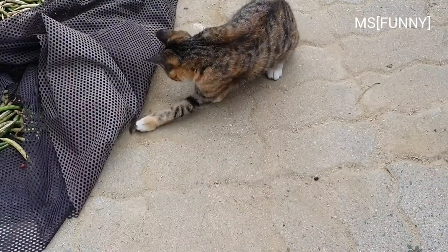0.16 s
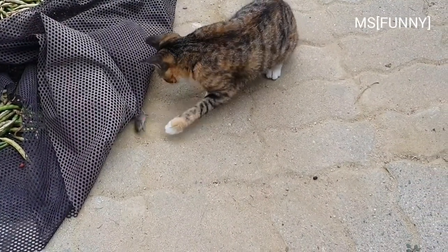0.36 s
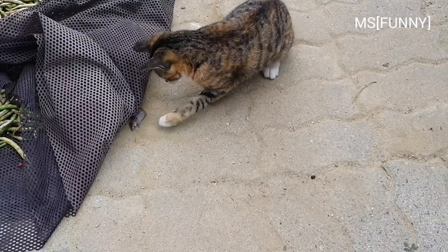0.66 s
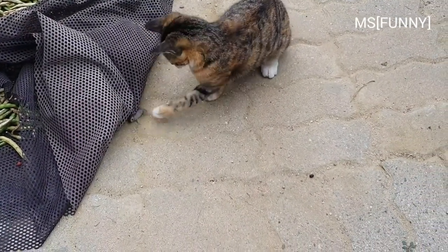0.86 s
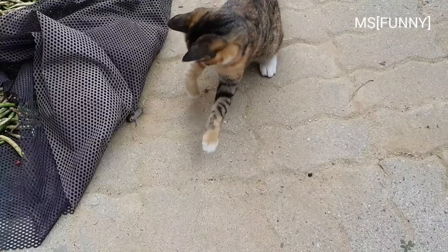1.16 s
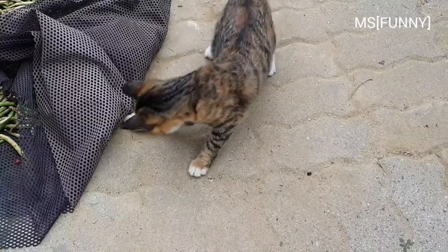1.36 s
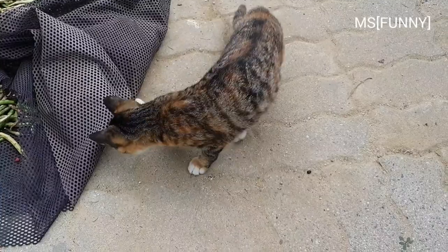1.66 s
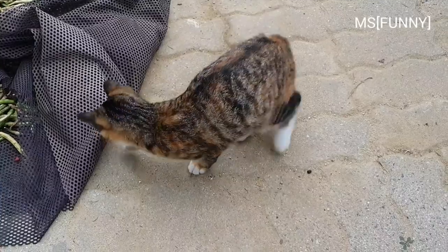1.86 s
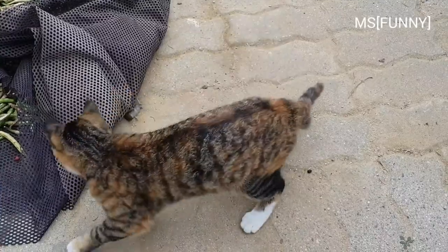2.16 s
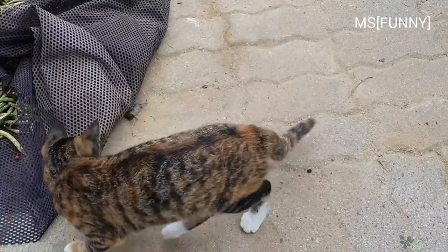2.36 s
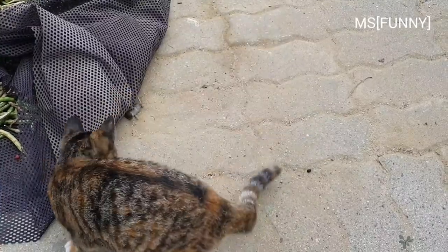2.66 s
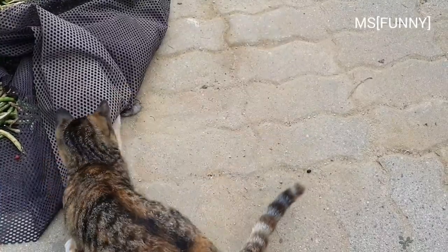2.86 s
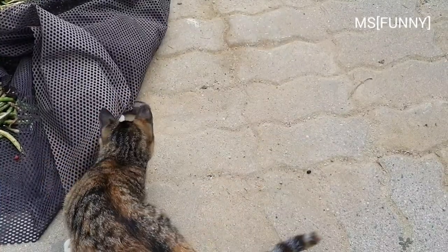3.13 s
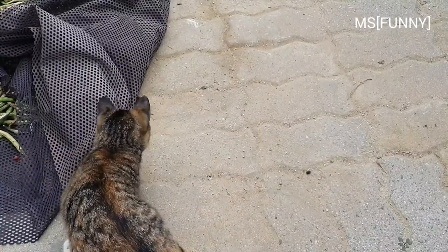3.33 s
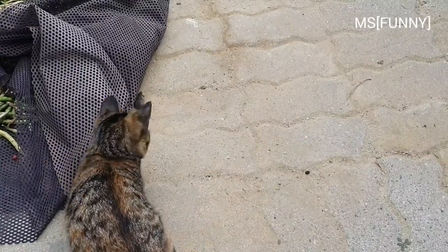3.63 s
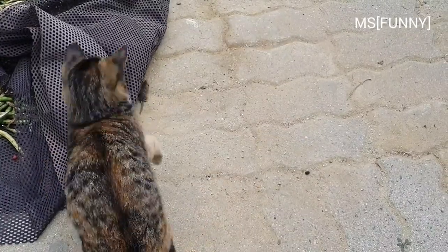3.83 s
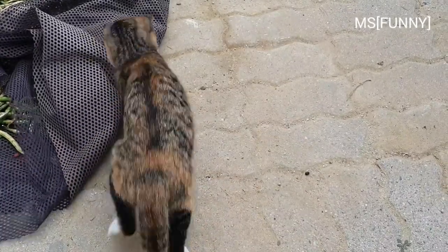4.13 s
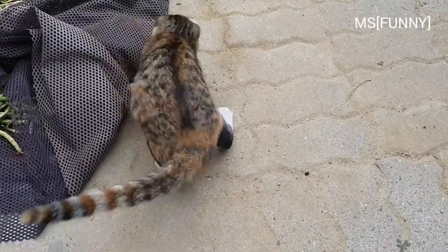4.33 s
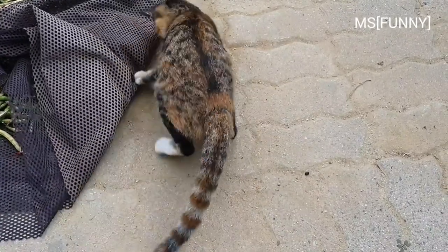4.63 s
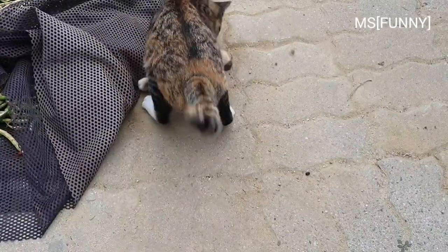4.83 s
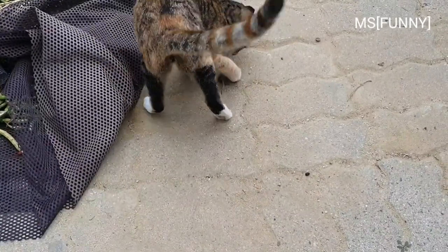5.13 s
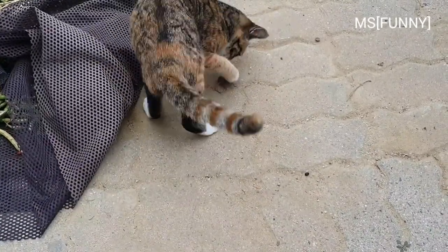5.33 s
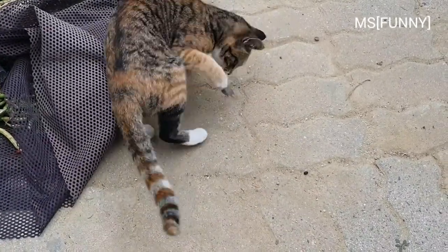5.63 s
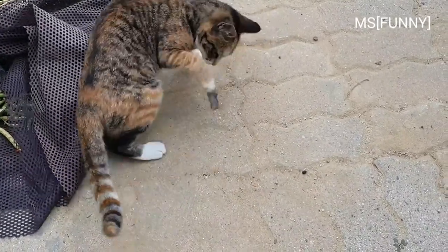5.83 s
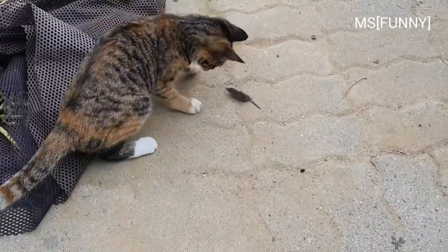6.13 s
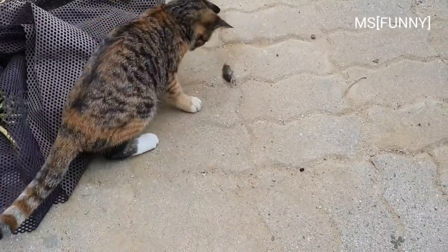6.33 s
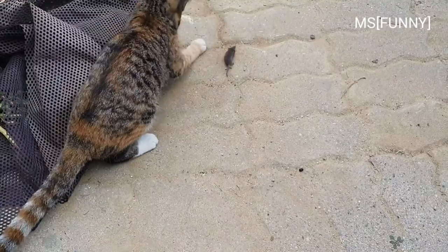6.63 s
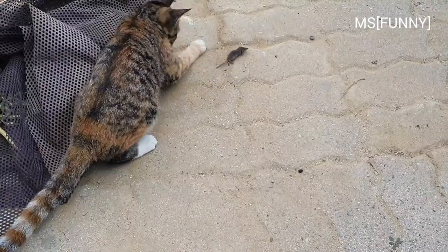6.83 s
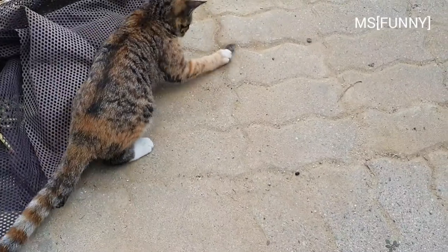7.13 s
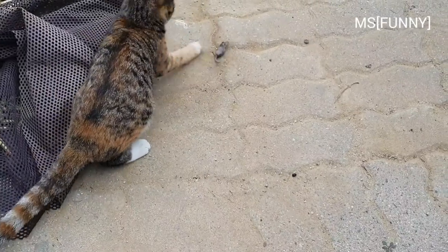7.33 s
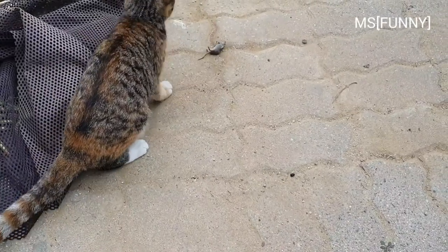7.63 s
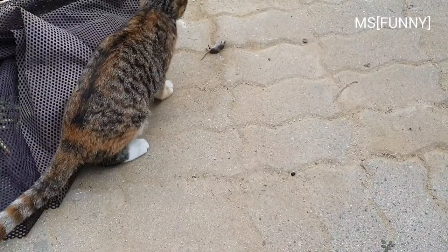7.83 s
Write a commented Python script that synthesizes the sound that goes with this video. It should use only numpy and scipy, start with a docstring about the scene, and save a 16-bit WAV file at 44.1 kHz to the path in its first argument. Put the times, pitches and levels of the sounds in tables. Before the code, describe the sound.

A mouse gives brief, extremely high fluttering squeaks and breathy rasps as a cat paws at it, amid echoing birdsong, faint hoarse calls and hiss.

```python
"""A mouse whistles fluttering squeaks on paving, close by, while a cat paws at it beside a heap of netting.
The squeaks are gliding tones with a trembling beat; rasps, brushing paws and thuds are shaped noise or rough tones.
Birds call in echoing surroundings and a hoarse low call comes from afar, over traffic rumble and microphone hiss.
The loudest squeaks overload the converter."""
import sys
import numpy as np
from scipy import signal
from scipy.fft import rfft, irfft, next_fast_len
from scipy.io import wavfile
from scipy.ndimage import uniform_filter1d, map_coordinates

SR = 44100
rng = np.random.default_rng(int(sys.argv[2]) if len(sys.argv) > 2 else 0)


def generate_wav(signal):
    """Clip the signal to [-1, 1] and save it as 16-bit WAV at the path in sys.argv[1]."""
    frames = np.transpose(np.atleast_2d(signal))
    scaled = np.clip(frames, -1, 1) * 32767
    pcm = np.round(scaled).astype(np.int16)
    wavfile.write(sys.argv[1], SR, pcm)


N = 351918
TIME = np.arange(N) / SR
EDGE_DB = 20  # how far a swell lies under its peak one rise before it and one fall after it

# colour of the mouse's breath noise: f/Hz, level per Hz/dB
BREATH_COLOUR = [(3240, -69), (5500, -42), (6910, -15.5), (7950, -20), (8540, -16.5), (13300, -1),
                 (14900, -14), (15100, -11.5)]
# colour of the traffic drone, also used for the puff in the thuds: f/Hz, level per Hz/dB
DRONE_COLOUR = [(70, -66), (105, -11), (140, -10), (210, -5.5), (260, -11), (330, -21), (500, -24),
                (800, -27.5), (1200, -39.5), (2500, -76)]


def amp(db):
    """Turn decibels into a factor for the wave."""
    return 10 ** (np.asarray(db) / 20)


def unit(x):
    """Scale x to an rms (average strength) of 1."""
    return x / np.sqrt(np.mean(np.abs(x) ** 2) + 1e-20)


def along(points, hz):
    """Read a curve of (Hz, value) points on a log frequency axis."""
    f, value = np.transpose(points)
    return np.interp(np.log(hz + 1), np.log(f + 1), value)


def curves(tables, fade=0.001):
    """A gate that is open inside the tables, then one smooth curve for each column; fade in s."""
    s, *columns = np.vstack(tables).T
    is_open = np.any([(TIME >= rows[0][0]) & (TIME <= rows[-1][0]) for rows in tables], axis=0)
    drawn = [is_open * 1.] + [np.interp(TIME, s, column) for column in columns]
    return [uniform_filter1d(curve, int(fade * SR) + 1) for curve in drawn]


def swells(rows, flat):
    """For rows (peak s, rise s, fall s, Hz, peak dB, ..): level dB, dB under the peak, Hz and further columns.
    The loudest row wins at each sample. The larger flat, the broader the top."""
    rows = np.array(rows)
    level_db, which = np.full(N, -150.), np.zeros(N, int)
    for k, (s, rise, fall, _, db) in enumerate(rows[:, :5]):
        near = slice(max(0, int((s - .5) * SR)), int((s + .5) * SR))
        distance = np.maximum((s - TIME[near]) / abs(rise), (TIME[near] - s) / abs(fall))
        own_db = db - EDGE_DB * distance ** flat
        which[near] = np.where(own_db > level_db[near], k, which[near])
        level_db[near] = np.maximum(own_db, level_db[near])
    _, _, _, hz, db, *more = rows[which].T
    return [level_db, np.clip(db - level_db, 0, 2 * EDGE_DB), hz] + more


def wobble(rate, channels=1):
    """Smooth random curves of rms 1, with rate knots a second."""
    knots = rng.standard_normal((channels, int(N * rate / SR) + 4))
    return unit(np.array([map_coordinates(k, [TIME * rate]) for k in knots]))


def filtered(x, response):
    """Weigh the frequencies of x by a response."""
    m = next_fast_len(N + 8192)
    return irfft(rfft(x, m) * response(np.fft.rfftfreq(m, 1 / SR)), m)[..., :N]


def rush(spectrum):
    """Stereo noise of rms 1 whose sides are alike in the bass and unrelated in the treble."""
    # likeness of left and right: f/Hz, likeness/0-1
    likeness = [(60, 0.95), (150, 0.91), (380, 0.41), (940, 0.028), (2340, 0.02), (5860, 0.017),
                (14700, 0.0285)]

    def mid_and_side(hz):
        turn = np.arccos(np.clip(along(likeness, hz), -1, 1)) / 2
        return amp(along(spectrum, hz)) * [np.cos(turn), np.sin(turn)]

    mid, side = filtered(rng.standard_normal((2, N)), mid_and_side)
    return unit(np.array([mid + side, mid - side]))


def echoes(x, t60, gap):
    """A diffuse tail, different in each channel: it starts after gap s and falls 60 dB in t60 s."""
    t = np.arange(int(SR * t60)) / SR
    tail = rng.standard_normal((2, len(t))) * amp(-60 * t / t60) * (t > gap)
    return signal.fftconvolve(np.atleast_2d(x), tail / np.linalg.norm(tail[0]), axes=1)[:, :N]


def sides(pan_db):
    """Left and right factors; a positive pan_db makes the left louder."""
    return amp(np.array([pan_db / 2, -pan_db / 2]))


def whistle(hz, rough, flicker, lag=0):
    """A stereo tone whose strength and phase flicker by the share rough; the left lags by lag s."""
    side_delay = np.array([lag / 2, -lag / 2]).reshape(2, -1)
    phase = 2 * np.pi * (np.cumsum(hz) / SR - hz * side_delay)
    a, b = flicker
    rough = np.clip(rough, 0, 1)
    steady = np.sqrt(1 - rough ** 2)
    return np.sqrt(2) * ((steady + rough * a * 1.1) * np.sin(phase) + rough * b * 1.1 * np.cos(phase))


def squeaks():
    """A whistle in the larynx; the trembling breath moves pitch and level on every beat.
    The balance between left and right shifts along each squeak."""
    # one curve for each squeak: t/s, f/Hz, level/dB
    notes = [
        [(.451, 12170, -24), (.457, 12200, -16.5), (.461, 13290, -18), (.470, 13420, -15), (.480, 13090, -11),
         (.486, 12920, -9.5), (.493, 12930, -5), (.508, 12670, -3.5), (.514, 12670, -4.5), (.521, 12600, -9.5),
         (.526, 12800, -9.5), (.534, 13700, -12), (.540, 13050, -17.5), (.544, 13450, -28), (.550, 12240, -27),
         (.556, 12820, -41)],
        [(.799, 12400, -27), (.807, 12790, -32), (.815, 12500, -26), (.8165, 14400, -18), (.835, 13940, -23),
         (.855, 14060, -19), (.866, 13300, -18.5), (.884, 13100, -23), (.888, 13200, -33), (.902, 13180, -39)],
        [(1.622, 11750, -33), (1.634, 12000, -34.5), (1.640, 11600, -26), (1.648, 12200, -34)],
        [(1.654, 12100, -20), (1.662, 12360, -22.5), (1.668, 12190, -27), (1.673, 11370, -33),
         (1.678, 11410, -44)],
        [(1.681, 11340, -39), (1.693, 11570, -33), (1.7145, 11860, -28.5), (1.7165, 12900, -29),
         (1.724, 12700, -23), (1.734, 12600, -37.5)],
        [(4.648, 12200, -18), (4.651, 12360, -11), (4.659, 12330, -9), (4.666, 12660, -5.5),
         (4.671, 12610, -6.5), (4.685, 12510, -12.5), (4.697, 12370, -16.5), (4.709, 11350, -23),
         (4.714, 11070, -26), (4.724, 11600, -36), (4.730, 10970, -33)],
        [(4.733, 10100, -56), (4.757, 10550, -33.5), (4.779, 11300, -28), (4.792, 11400, -37.5),
         (4.800, 11940, -34), (4.819, 11770, -39.5)],
        [(4.995, 10050, -47), (5.003, 10300, -43), (5.009, 10600, -44), (5.012, 10700, -35),
         (5.017, 10900, -32), (5.027, 11300, -35), (5.042, 11000, -33), (5.056, 11650, -31),
         (5.066, 11130, -31), (5.081, 11400, -37), (5.09, 10860, -49), (5.13, 11200, -58)],
        [(5.225, 9750, -44), (5.239, 10950, -34), (5.277, 10760, -32.5), (5.281, 11000, -27),
         (5.296, 11540, -22.5), (5.318, 11220, -25), (5.34, 11460, -24.5), (5.352, 11500, -38),
         (5.37, 11400, -46)],
        [(5.671, 9560, -30), (5.678, 10060, -33), (5.689, 10570, -19.5), (5.703, 10870, -20.5),
         (5.710, 11500, -27), (5.717, 11900, -14), (5.722, 12260, -7.5), (5.734, 12270, -5.5),
         (5.739, 11200, -20), (5.746, 11900, -14.5), (5.750, 10950, -24.5), (5.763, 10490, -35)],
    ]
    # one row for each squeak: first crest t/s, beat rate/Hz, pitch swing/Hz, level swing/dB, roughness/0-1,
    # left lag/s, left-right level at the start/dB, left-right level at the end/dB
    flutter = np.array([(0.4532, 115, 30, 0.2, 0, -5e-6, 6, 0.5),
                        (0.8028, 130, 335.6, 1, 0.18, -16e-6, 4, 7),
                        (1.627, 170, 200.3, 2, 0.2, 4e-6, 16, 9), (1.672, 140, 40.1, 0.5, .1, 4e-6, 8, 0),
                        (1.7007, 120, 220, 1, 0.2, -12e-6, 19, 2),
                        (4.6505, 130, 170.6, 0.5, 0.14, 7e-6, 6, 12.5),
                        (4.76, 100, 142, 2.5, 0.23, 18e-6, 11, 2), (5.01, 130, 200, 1, 0.08, 6e-6, 5, 2),
                        (5.236, 89, 187.2, 0.5, 0.22, 20e-6, 4, -2.5),
                        (5.679, 110, 150, 1, 0.06, 12e-6, 13, -4.5)])
    # where the voice catches: t/s, half width/s
    breaks = np.array(sorted([(.5445, 0.0017), (.8065, .0015), (.8157, 0.00087), (1.63, 0.00093),
                              (1.639, 0.001), (1.648, 0.001), (1.7155, 0.0009), (4.6553, 0.0025),
                              (4.6635, 0.0016), (4.793, 0.0014), (4.807, .0011), (5.020, 0.0019),
                              (5.044, 0.00099), (5.065, 0.001), (5.076, .003), (5.232, 0.00304),
                              (5.242, .002), (5.252, 0.0012), (5.268, .0015), (5.279, 0.001),
                              (5.678, 0.0014), (5.708, 0.00088), (5.714, 0.0014)]))
    break_depth = 0.9  # share of the sound lost in the middle of a catch
    wander_db = 1.2  # random wander between the sides, rms

    gate, hz, db = curves(notes)
    # each squeak's settings begin 20 ms before its first crest
    row = np.clip(np.searchsorted(flutter[:, 0], TIME + .02) - 1, 0, None)
    crest, rate, swing, swing_db, rough, lag = flutter[row, :6].T
    note_ends = [s for note in notes for s in (note[0][0], note[-1][0])]
    pan_db = np.interp(TIME, note_ends, flutter[:, -2:].ravel()) + wander_db * wobble(70)[0]

    beat = np.cos(2 * np.pi * rate * (TIME - crest) + 0.28 * wobble(50)[0])
    pitch = hz + swing * beat + 40 * wobble(300)[0]
    tone = whistle(pitch, rough, wobble(700, channels=2), lag + 3e-6 * wobble(40)[0])
    # air past the whistle
    breath = unit(filtered(rng.standard_normal((2, N)), lambda f: amp(along(BREATH_COLOUR, f))))

    midpoints = (breaks[1:, 0] + breaks[:-1, 0]) / 2
    nearest, width = breaks[np.searchsorted(midpoints, TIME)].T
    gate = gate * (1 - break_depth * np.exp(-((TIME - nearest) / width) ** 4))
    return gate * amp(db + swing_db * beat) * sides(pan_db) * (tone + (amp(-35.5) + 0.25 * rough) * breath)


def rasps():
    """Air bursts unevenly through the open larynx: treble noise, strongest at the mouth's resonance."""
    # voiceless rasps: peak t/s, rise/s, fall/s, mouth resonance f/Hz, peak level before mixing/dB,
    # left-right level/dB
    bursts = [(.440, 0.016, 0.0051, 12730, -32.5, 4), (.4455, .005, .002, 11240, -26, 3),
              (.792, 0.002, .012, 12240, -33, 5.5), (.812, 0.018, .02, 13080, -37.5, 4),
              (1.634, 0.014, .03, 11560, -33.5, 4), (1.652, .005, .012, 13200, -26, -12),
              (1.674, .006, 0.022, 11850, -34, 7), (4.436, 0.02, 0.0201, 13130, -28, 3),
              (4.444, 0.0039, 0.005, 13000, -14, 6), (4.453, 0.0096, 0.0096, 13300, -15.5, 6),
              (4.462, 0.0048, .03, 13000, -17.5, 2), (4.483, .02, .05, 14000, -21, 2),
              (4.645, 0.0115, 0.0032, 11800, -26, 10), (4.961, 0.0012, 0.0046, 11740, -39, 17),
              (4.985, .04, .04, 12000, -42, 7), (5.235, 0.032, .06, 11270, -39, 3.5),
              (5.66, 0.024, .006, 11800, -47, 8), (5.668, 0.0048, 0.0084, 11870, -25.5, 12.5)]
    db, _, hz, pan_db = swells(bursts, flat=1.5)
    # a little noise shared by both sides, much more of their own
    air = 0.17 * rng.standard_normal(N) + 2.1 * rng.standard_normal((2, N))
    wide = unit(filtered(air, lambda f: amp(along(BREATH_COLOUR, f))))
    # each side has its own flicker, which blurs the tone into a noise band
    mouth = np.array([whistle(hz, 0.99, wobble(1800, channels=2))[side] for side in range(2)])
    uneven = unit(amp(1.8 * wobble(450)))
    return amp(db) * sides(pan_db) * uneven * (0.5 * wide + 0.51 * mouth)


def nearby(x):
    """Sound bounces off paving, net and cat: a few early reflections, then a faint short tail."""
    # reflections: delay/s, left level/dB, right level/dB
    bounces = [(.0006, -22, -18), (.0017, -29, -24), (.0041, -30, -27), (.0083, -33, -31)]
    early = 0
    for s, left_db, right_db in bounces:
        early = early + amp([[left_db], [right_db]]) * np.roll(x, round(s * SR), axis=1)
    return x + early + amp(-27) * echoes(x, t60=.15, gap=.003)


def mesh(hz):
    """The sound of the net by frequency: thin in the bass, with a hollow hump near 1900 Hz."""
    thin = hz ** 2 / (hz ** 2 + 500 ** 2)
    return thin * amp(3 / (1 + ((hz - 1900) / 500) ** 2))


def paws():
    """Fur and claws drag over mesh and paving: short swells of grainy noise."""
    # strokes: middle t/s, bell width (one standard deviation)/s, level/dB, brightness/dB per octave,
    # left-right level/dB
    strokes = [(0.499, 0.042, -40, 0, 3.5), (0.853, 0.035, -44, -0.5, -2), (1.681, 0.069, -52.5, -6, 1),
               (2.748, 0.028, -43.5, -3.5, 1.5), (3.126, 0.12, -43, 0, -0.5), (3.499, 0.048, -54, -37, 5),
               (3.898, 0.036, -46, 2, 7), (2.738, 0.0058, -43, -10.5, -0.5), (4.276, 0.00077, -39, -9, 0),
               (4.326, 0.0025, -44, -4, -3), (4.314, 0.031, -36.5, -1, 1.5), (4.495, 0.0011, -42, -6, 1.5),
               (4.583, 0.0608, -47, 1.5, -5), (4.746, 0.038, -47, 0.5, -4), (4.856, 0.0017, -39, 2, 10),
               (4.875, .002, -42, 1, 0), (4.474, 0.063, -43.5, -0.5, 3), (4.682, 0.036, -37.5, 0.5, 5),
               (4.793, 0.016, -40, 0.8, 0.5), (4.869, 0.034, -37, -0.2, 2.5), (5.268, 0.051, -51.5, -1, -9),
               (5.713, 0.049, -44.5, 1, 1), (6.018, 0.031, -43.5, 1, 7.5), (7.203, 0.019, -60, -4, 15),
               (7.505, 0.014, -53, -1, 3)]
    out = np.zeros((2, N))
    t = np.arange(SR // 2) / SR - .25
    hz = np.fft.rfftfreq(len(t), 1 / SR) + 1
    for s, width, db, tilt_db, pan_db in strokes:
        i = int((s - .25) * SR)
        # part of the noise is shared by both sides
        noise = .5 * rng.standard_normal(len(t)) + 1.23 * rng.standard_normal((2, len(t)))
        colour = amp(tilt_db * np.log2(hz / 3000)) * mesh(hz)
        noise = unit(irfft(rfft(noise) * colour, len(t)))
        stroke = amp(db) * sides(pan_db)[:, None] * noise * np.exp(-.5 * (t / width) ** 2)
        out[:, i:i + len(t)] += stroke[:, :N - i]
    grain = unit(amp(1.55 * wobble(120) + 1.8 * wobble(400, channels=2)))
    return out * grain


def thuds():
    """Soft thuds of paws and body: a dull low bump with a puff of noise above it."""
    # bumps: peak t/s, rise/s, fall/s, f/Hz, peak level before mixing/dB
    bumps = [(.51, .04, 0.076, 200, -42.5), (.87, .04, 0.055, 200, -50.5), (1.73, .04, 0.05, 180, -44.5),
             (3.71, .04, 0.074, 170, -41.5), (5.3, .05, .07, 170, -44), (5.7, .03, 0.093, 180, -40.5)]
    db, _, hz = swells(bumps, flat=1.5)
    bump = whistle(hz, 0.77, wobble(60, channels=2))
    return amp(db) * (0.87 * bump + 1.2 * rush(DRONE_COLOUR))


def birds():
    """A near bird: the clear core of a note arrives direct, its burr mostly through the echoes."""
    # one curve for each note: t/s, f/Hz, level before mixing/dB, burr (scale of the pitch slips)/Hz
    notes = [
        [(0, 4820, -59, 80), (.05, 4810, -52, 80), (.12, 4840, -70, 80)],
        [(2.725, 2850, -65, 44), (2.755, 3650, -47, 124), (2.775, 3970, -48.5, 66), (2.865, 4040, -44.5, 180),
         (2.9, 4060, -52, 260), (2.97, 4000, -49.5, 15.5), (3.0, 3970, -56, 20)],
        [(2.34, 3420, -60, 101.7), (2.372, 3970, -49, 117), (2.435, 4050, -49, 150), (2.48, 3900, -66, 100)],
        [(3.018, 2970, -48, 60.3), (3.043, 4180, -42.5, 151), (3.07, 4790, -39.5, 350), (3.1, 5380, -43, 503),
         (3.128, 6010, -41, 500)],
        [(3.13, 4710, -37, 402), (3.165, 5750, -41.5, 494), (3.2, 6020, -49, 495), (3.24, 5740, -58, 492),
         (3.27, 5520, -70, 301)],
        [(3.436, 3720, -50, 59.7), (3.445, 4200, -44, 100), (3.456, 4580, -40, 120), (3.476, 4660, -37, 130),
         (3.562, 4643, -36, 130), (3.578, 4570, -58, 100.2)],
        [(3.595, 4320, -60, 78.8), (3.602, 4630, -44, 110), (3.655, 4650, -44, 110.4), (3.68, 4630, -66.5, 41),
         (3.72, 4630, -60, 40.4), (3.84, 4540, -68.5, 30)],
        [(4.01, 4850, -61, 29.5), (4.03, 4900, -50.5, 29.6), (4.07, 5020, -66, 29.8),
         (4.085, 4950, -76.5, 30.3)],
    ]
    all_rough_hz = 500  # the deeper the burr, the rougher the note; wholly rough at this depth
    husk_below_hz, husk_db = 510, -10  # a hoarse band under each note

    gate, hz, db, burr_hz = curves(sorted(notes), fade=0.0041)
    drop = np.tanh(wobble(260)[0] ** 2 / 3) * 1.6  # the pitch keeps slipping below the note's top
    rough = np.clip(burr_hz / all_rough_hz, 0, 1)
    song = (gate * amp(db) * whistle(hz - burr_hz * drop, rough, wobble(600, channels=2)))[0]
    husk = (gate * amp(db + husk_db) * whistle(hz - husk_below_hz, 0.92, wobble(900, channels=2)))[0]
    # squaring a tone doubles its pitch: a faint overtone one octave up
    overtone = amp(-28) * unit(song ** 2) * np.std(song)
    song = song + filtered(overtone, lambda f: f > 6000)

    voice = song + husk
    direct = amp(-1) * (1 - .6 * rough) * voice
    return direct + amp(-9 + 8 * rough) * echoes(voice, t60=.4, gap=.004) * sides(-1.8)[:, None]


def far_birds():
    """Blurred gliding notes; scattered on their way, so the sides are unrelated."""
    # notes: start t/s, length/s, start f/Hz, end f/Hz, starting level/dB
    chatter = [(0, 0.15, 4110, 4050, -59), (0.176, 0.21, 4220, 3800, -55.5),
               (0.71, 0.18, 3860, 3850, -53.5), (1.12, 0.14, 3520, 3500, -57),
               (1.973, 0.11, 4100, 4100, -66), (2.097, 0.12, 4200, 4120, -58.5),
               (2.606, 0.099, 3830, 3900, -60), (3.961, .06, 4100, 4000, -57),
               (4.072, 0.038, 4050, 4050, -53.5), (4.13, 0.13, 3900, 3850, -56.5),
               (4.44, .07, 4050, 4150, -53), (4.53, .1, 3750, 3703, -59.5),
               (4.646, 0.066, 3900, 4200, -48.5), (4.789, .045, 4080, 4080, -49),
               (4.93, .16, 3940, 3900, -58), (5.215, 0.068, 4000, 3950, -53.5),
               (5.32, .12, 4050, 3950, -58), (5.47, 0.1, 4050, 4000, -60.5),
               (5.686, 0.097, 4360, 4500, -64), (5.938, 0.26, 4420, 4380, -57),
               (6.204, 0.25, 4370, 3930, -54), (6.549, .11, 4070, 4150, -57.5),
               (6.719, 0.22, 3920, 4170, -56.5), (7.021, 0.24, 4060, 3910, -59),
               (7.488, 0.13, 4050, 3870, -58), (7.728, .14, 4250, 4290, -62), (7.9, 0.084, 3960, 3950, -59)]
    fade_db_per_s = 15
    notes = []
    for s, length, start_hz, end_hz, db in chatter:
        notes.append([(s, start_hz, db), (s + length, end_hz, db - fade_db_per_s * length)])
    gate, hz, db = curves(notes, fade=.045)
    far = [whistle(hz + 45 * wobble(50)[0], .95, wobble(400, channels=2))[0] for side in range(2)]
    return gate * amp(db + 1.8 * wobble(22)) * np.array(far)


def far_calls():
    """A hoarse call whose throat favours the fifth overtone, and soft low hoots."""
    # one curve for each call or its fainter repeat, perhaps an echo: t/s, strongest overtone f/Hz, level/dB,
    # neighbouring overtones' level/dB
    calls = [
        [(1.3, 1520, -68, 0), (1.325, 1630, -59, -3), (1.37, 1636, -56.5, -3.5), (1.415, 1615, -49, -9),
         (1.436, 1540, -53, -7), (1.455, 1480, -68, -7)],
        [(1.485, 1630, -72, -11), (1.502, 1630, -60.5, -8), (1.55, 1610, -76, -13)],
        [(2.125, 1460, -75, -4), (2.15, 1530, -59, -7), (2.192, 1597, -49, -10), (2.255, 1585, -53, -12),
         (2.28, 1545, -52, -4), (2.3, 1585, -57, -8), (2.325, 1572, -68, -10), (2.35, 1570, -57.5, -14),
         (2.4, 1597, -61.5, -12), (2.42, 1585, -65, -13), (2.46, 1585, -69, -15)],
        [(2.94, 1490, -60, -8), (2.99, 1580, -54, -12), (3.04, 1576, -47.5, -17), (3.06, 1578, -58, -14),
         (3.135, 1574, -57, -11), (3.165, 1570, -74, -14)],
        [(4.095, 1500, -68, -15), (4.13, 1620, -60.5, -20), (4.17, 1618, -49.5, -19), (4.228, 1620, -44, -29),
         (4.252, 1600, -57, -22), (4.285, 1600, -53, -22), (4.34, 1600, -59, -20)],
    ]
    # overtones beside the fifth; alternate strong and weak pulses give the halves: number, level/dB
    throat = [(4, -2), (6, -7), (4.5, -12), (5.5, -13), (3.5, -12)]
    # low hoots: peak t/s, rise/s, fall/s, f at the peak/Hz, peak level/dB
    hoots = [(1.15, .06, .06, 385, -46), (6.25, .3, .3, 455, -60)]
    scoop_hz = 110  # a hoot is this much lower where it is EDGE_DB under its peak

    gate, hz, db, beside_db = curves(calls, fade=.008)
    turn = 2 * np.pi * np.cumsum(hz + 9 * wobble(50)[0]) / SR / 5  # phase of the call's base pitch
    beside = sum(amp(level + 2.5 * wobble(50)[0]) * np.sin(k * turn) for k, level in throat)
    fifth = amp(.8 * wobble(45)[0]) * np.sin(5 * turn)
    call = gate * amp(db) * np.sqrt(2) * (fifth + amp(beside_db) * beside)

    db, weak_db, hz = swells(hoots, flat=1.5)
    hoot_hz = hz - scoop_hz * weak_db / EDGE_DB
    call = call + amp(db) * np.sin(2 * np.pi * np.cumsum(hoot_hz) / SR)
    return call * sides(1.5)[:, None] + amp(-7) * echoes(call, t60=.4, gap=0.0051)


def background():
    """Far traffic in two lumpy layers of noise over steady hiss."""
    # slow random unevenness of the rumble: t/s, deep level/dB, drone level/dB
    rumble = [(0.0, -40.5, -46), (0.29, -48, -49), (0.87, -38, -45.5), (0.98, -68, -49),
              (1.04, -43.5, -47.5), (1.6, -50.5, -45.5), (1.64, -39.5, -47), (3.15, -47, -46),
              (3.56, -38.5, -46), (3.71, -40.5, -48.5), (3.8, -55.5, -45.5), (4.02, -43, -46),
              (5.11, -40.5, -44), (5.29, -34.5, -43), (5.39, -44, -46), (5.45, -39, -45.5),
              (5.63, -48.5, -46.5), (5.74, -38, -46), (5.87, -43.5, -46), (5.96, -48.5, -46.5),
              (6.58, -43.5, -46.5), (6.62, -60.5, -45), (6.87, -44, -47), (7.69, -48, -46),
              (7.94, -41, -44), (7.98, -47, -42)]
    # colour of the deep layer: f/Hz, level per Hz/dB
    deep_colour = [(12, -61.5), (20, -23), (40, -11), (63, 2.5), (90, -7.5), (110, -11.5), (160, -40.5)]
    # colour of the microphone hiss: f/Hz, level per Hz/dB
    hiss_colour = [(300, -21), (700, 0), (1100, 0.5), (2500, 1.5), (5000, 0.5), (9000, -0.5), (13000, -2),
                   (14600, -1), (14800, -1)]
    _, deep_db, drone_db = curves([rumble])
    lumps_db = [[1.5], [1.1]] * wobble(9, channels=2)
    deep = amp(deep_db + lumps_db[0]) * rush(deep_colour)
    drone = amp(drone_db + lumps_db[1]) * rush(DRONE_COLOUR)
    hiss = amp(-51) * rush(hiss_colour)
    return (deep + drone) * sides(1.0)[:, None] + hiss * sides(0.58)[:, None]


def scene():
    """The mouse with its reflections, the cat, the birds and calls, and the background, added up."""
    mouse = nearby(squeaks() + rasps())
    return mouse + paws() + thuds() + birds() + far_birds() + far_calls() + background()


def record(dry):
    """The converter flattens peaks near full scale, folding overtones down; the band limit cuts the top."""
    # steep cut of the top, near 14.7 kHz: f/Hz, level/dB
    top_cut = [(14500, 0.5), (14750, -30), (14900, -24), (15260, -22)]
    top_hz = 15260  # nothing stays from here up
    flat = np.clip(dry, -.91, .91)
    return filtered(flat, lambda hz: amp(along(top_cut, hz)) * (hz < top_hz))


dry = scene()
out = record(dry)
generate_wav(out)
```